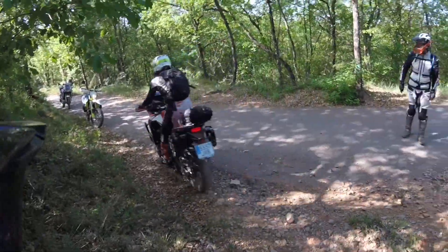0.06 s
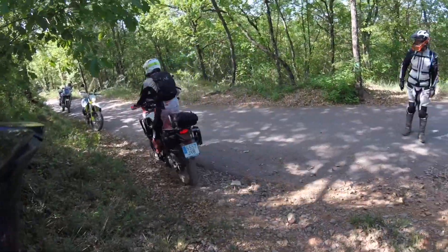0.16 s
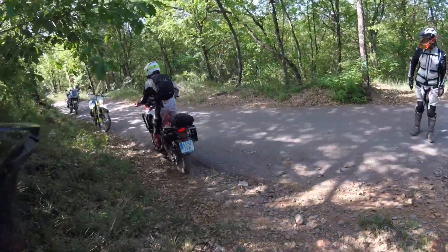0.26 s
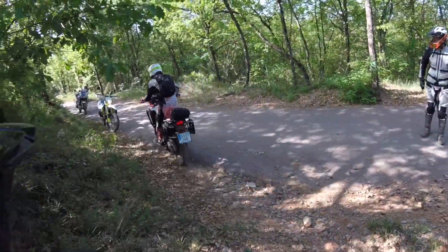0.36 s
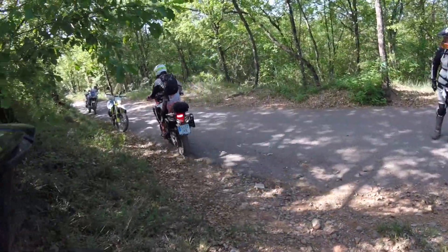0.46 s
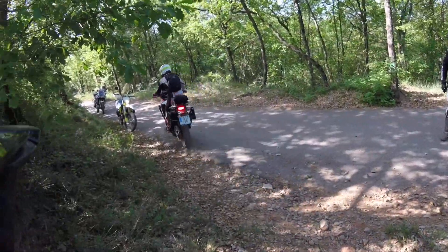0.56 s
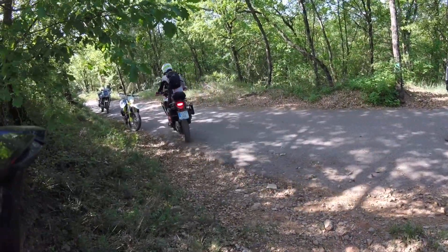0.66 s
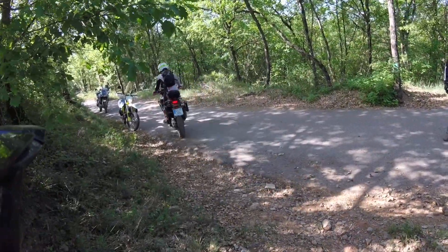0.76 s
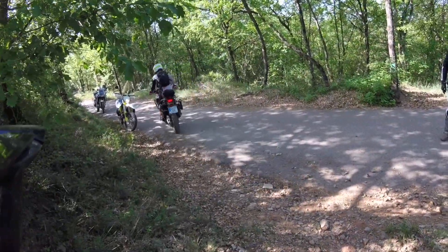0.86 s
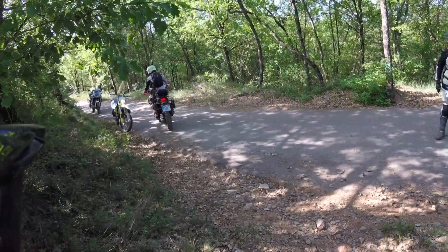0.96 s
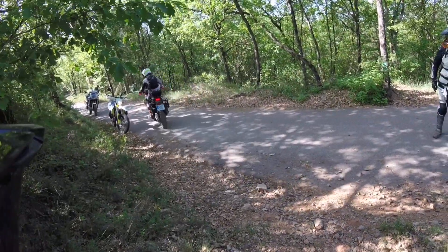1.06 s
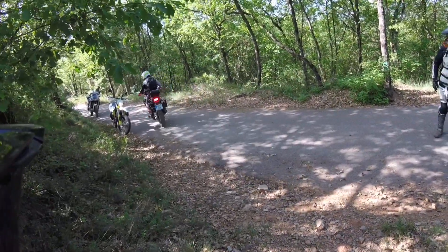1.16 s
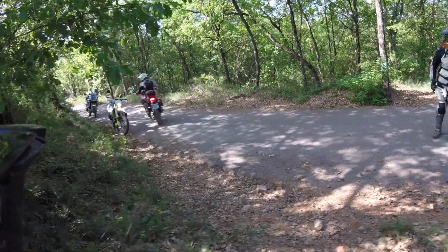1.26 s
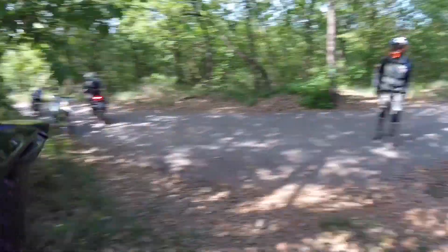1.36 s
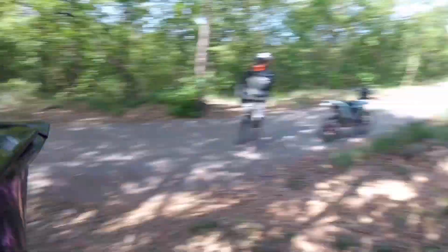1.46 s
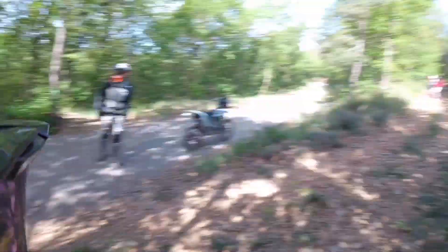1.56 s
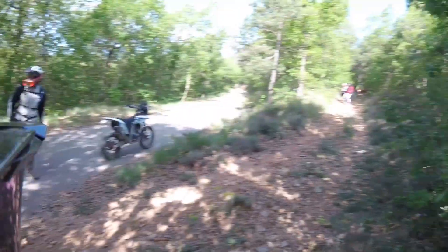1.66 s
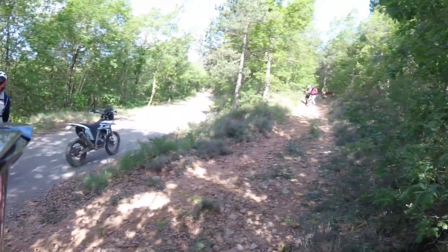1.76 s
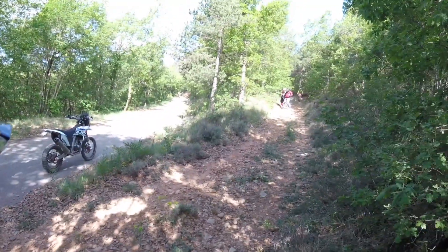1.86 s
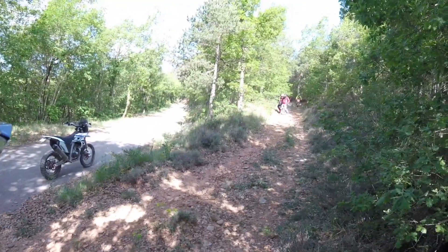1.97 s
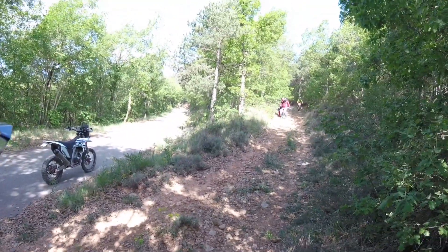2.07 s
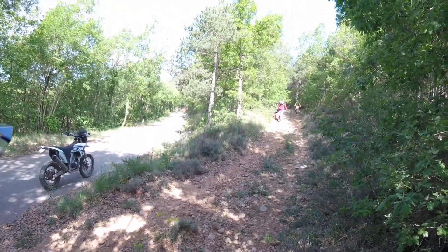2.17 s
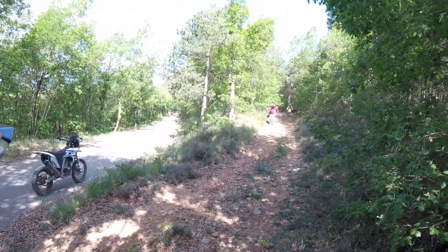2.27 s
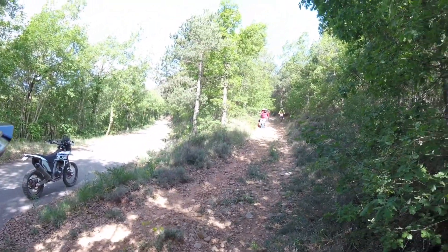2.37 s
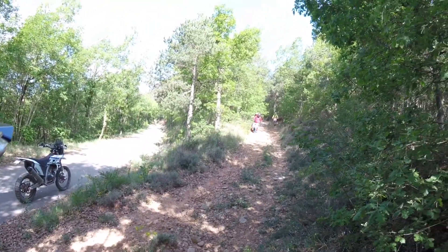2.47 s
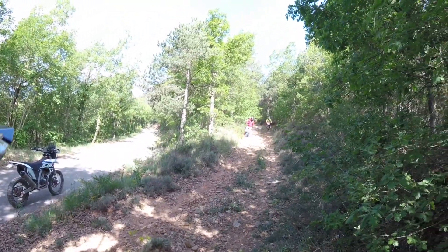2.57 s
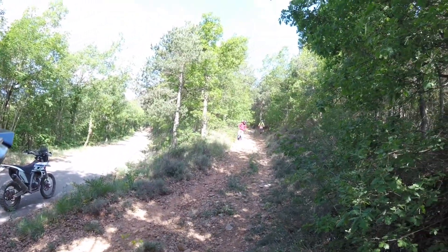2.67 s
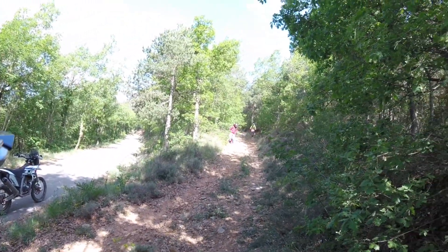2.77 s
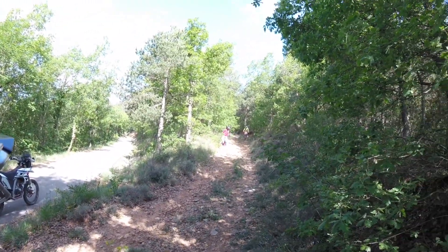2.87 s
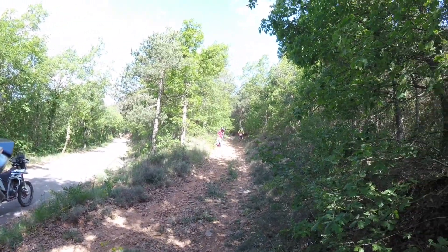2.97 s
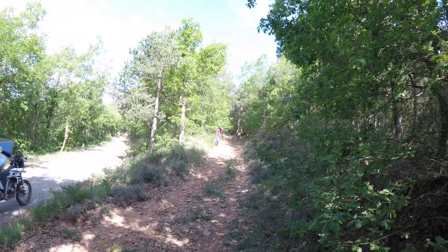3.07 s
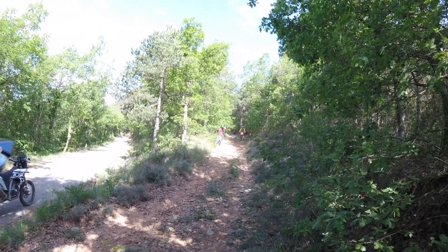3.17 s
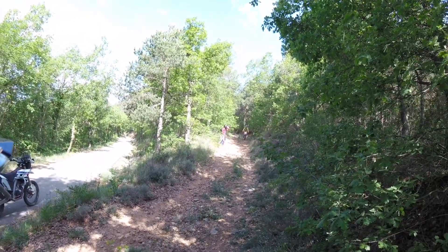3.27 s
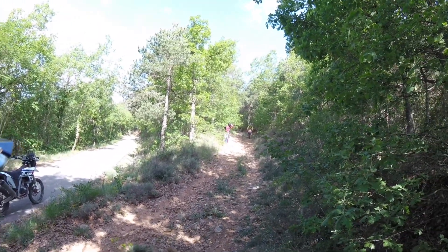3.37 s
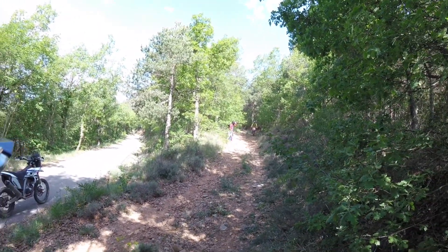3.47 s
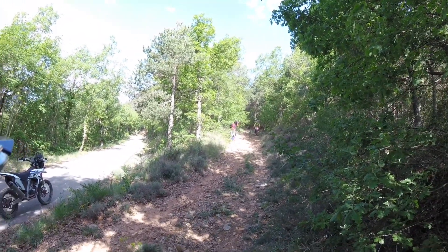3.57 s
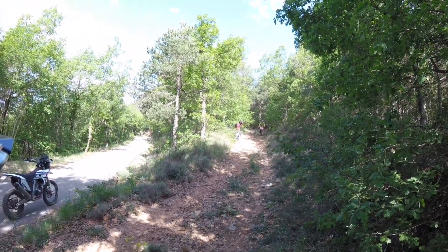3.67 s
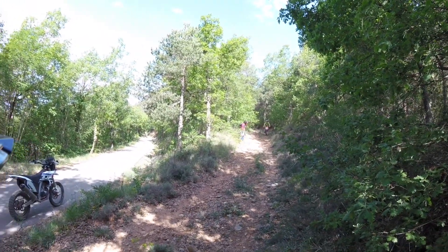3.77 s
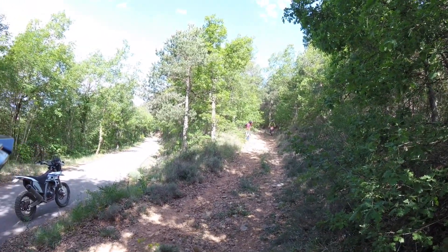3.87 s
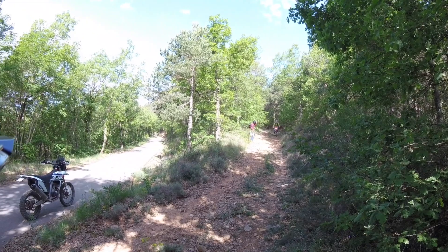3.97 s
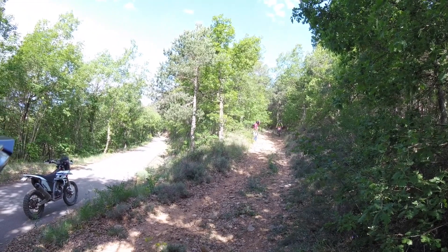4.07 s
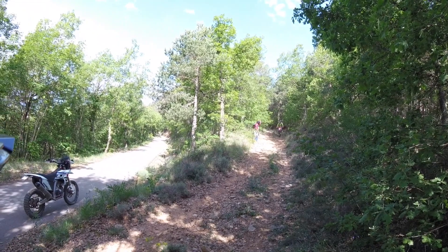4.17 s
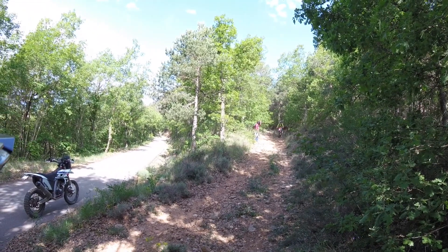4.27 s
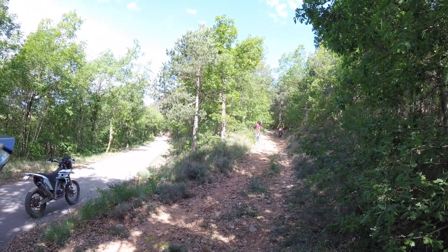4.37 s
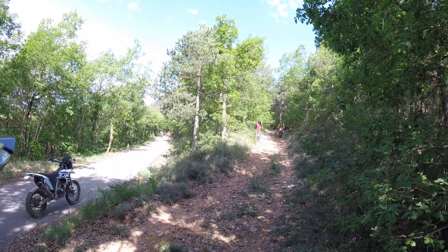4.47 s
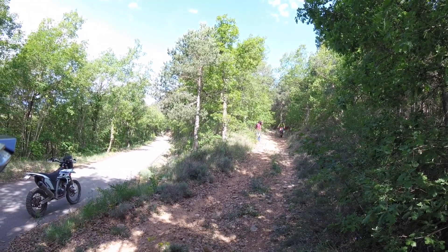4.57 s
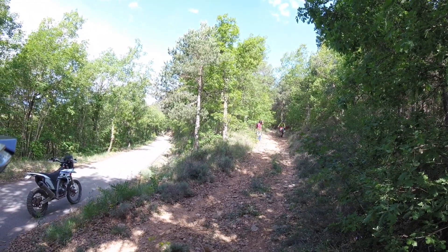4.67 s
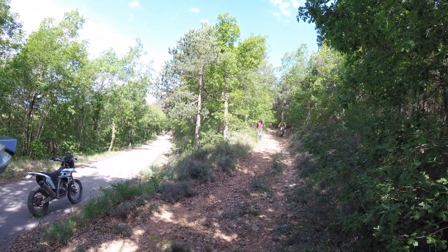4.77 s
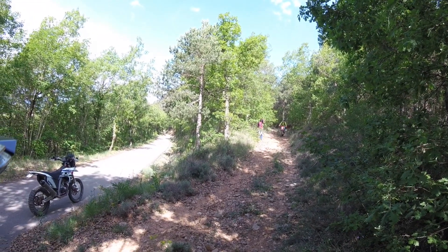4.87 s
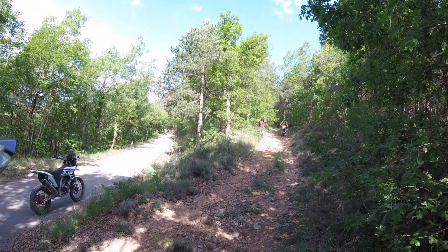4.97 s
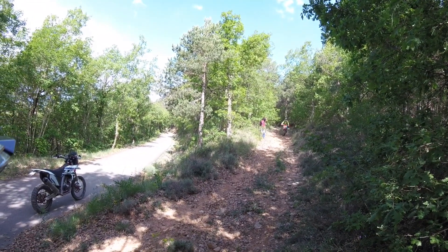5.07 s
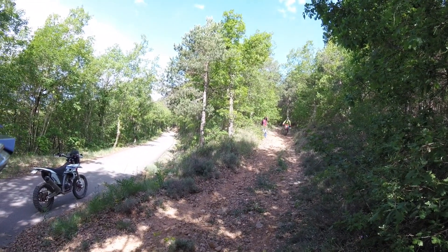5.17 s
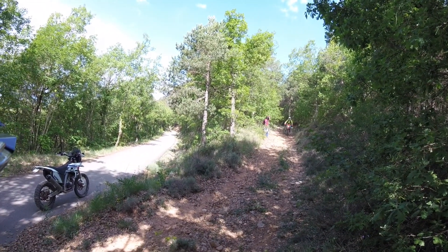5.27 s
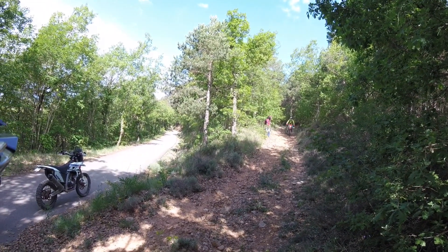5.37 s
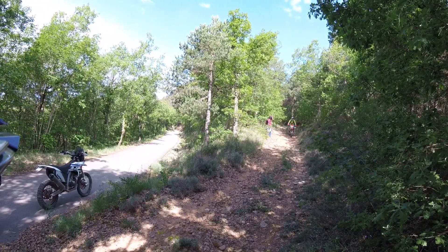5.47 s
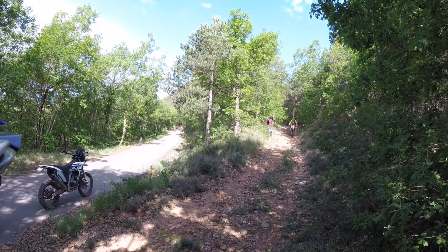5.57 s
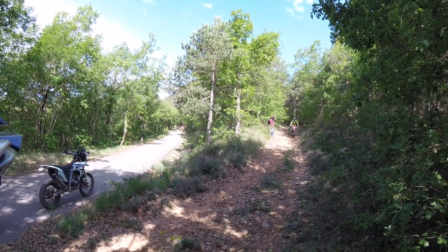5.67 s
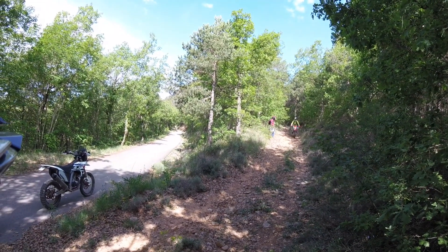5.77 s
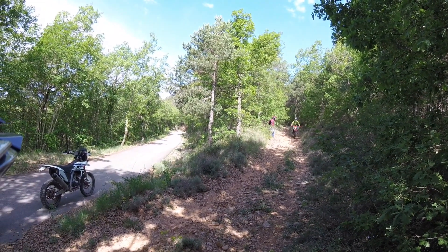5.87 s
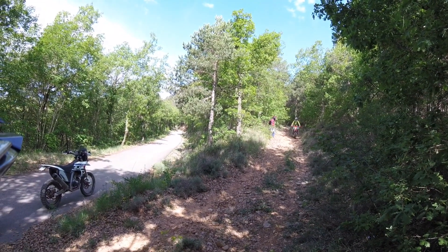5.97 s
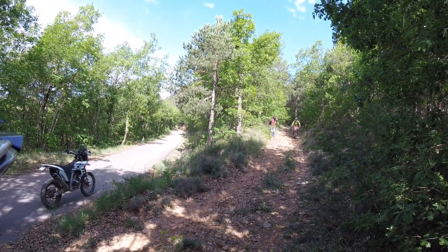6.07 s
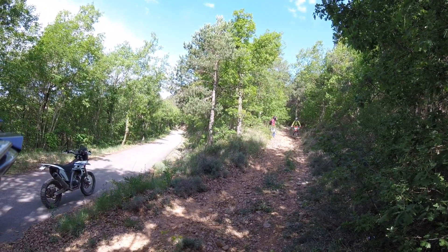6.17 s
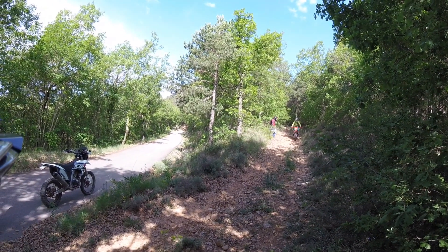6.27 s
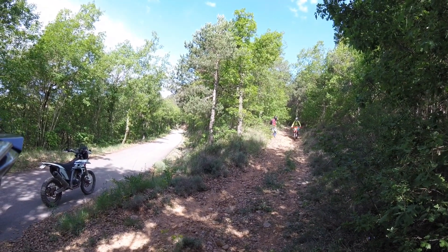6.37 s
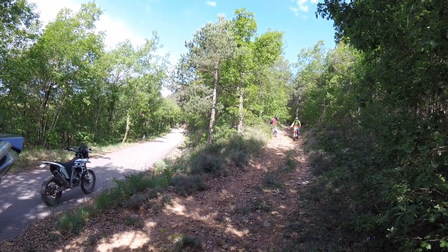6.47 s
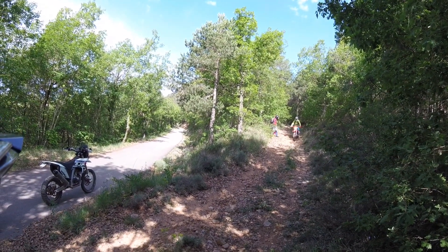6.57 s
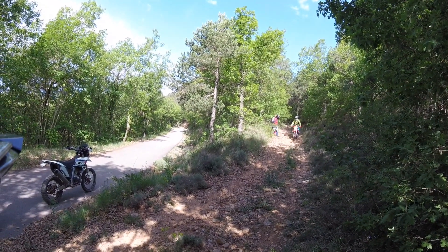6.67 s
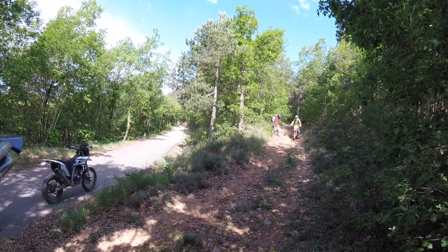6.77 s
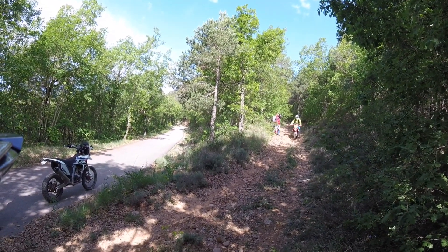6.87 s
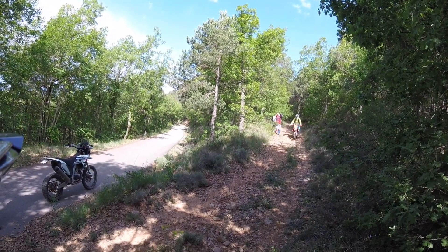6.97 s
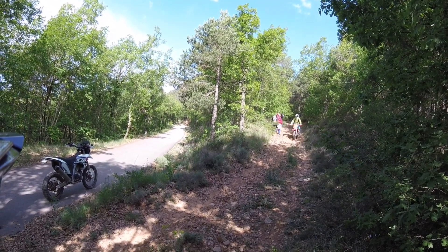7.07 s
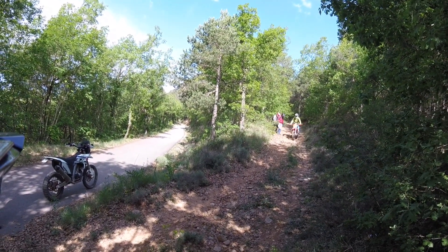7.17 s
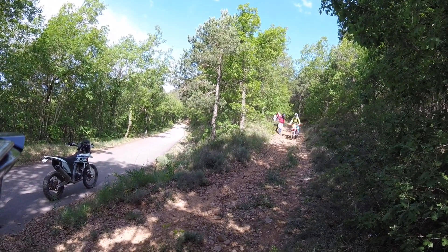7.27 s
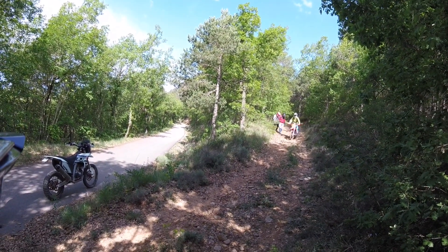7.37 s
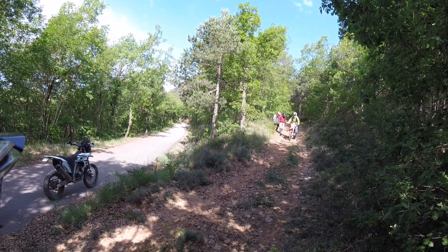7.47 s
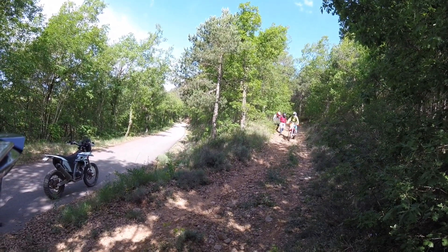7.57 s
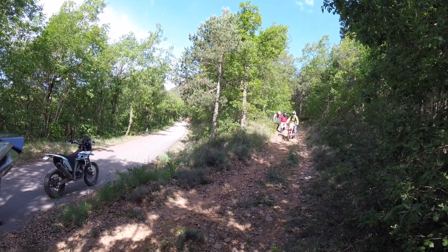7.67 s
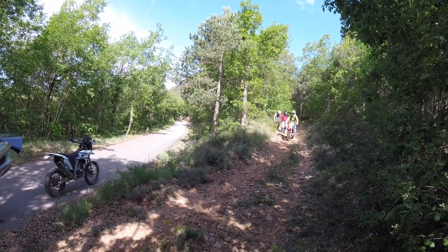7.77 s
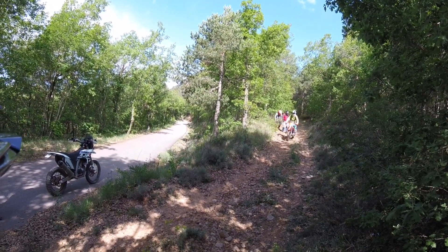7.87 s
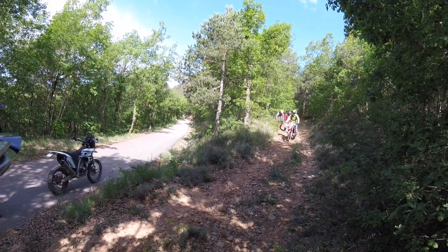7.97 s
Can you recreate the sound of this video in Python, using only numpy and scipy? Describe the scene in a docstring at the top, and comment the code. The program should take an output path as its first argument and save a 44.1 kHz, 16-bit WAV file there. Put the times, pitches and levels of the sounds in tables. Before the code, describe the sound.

Handheld camera microphone among trees: deep lumpy idle with metallic clatter starts near and fades over several seconds. Leaf hiss drops early. Faint gliding bird notes come from three to six seconds, then scattered gravel steps, scuffs and hollow knocks on the camera body. A quicker, single-beat motorcycle idle, quiet at first, swells toward the end. Muffled treble, no wind blasts.

```python
"""A forest track: a two-cylinder motorcycle idles and rolls off while boots crunch gravel and bump the camera.
As it recedes, tree echoes take a larger share of it; the leaf hiss drops, and from about 2 s the bass of the
whole scene fades out. From 3 s a bird sings in gliding whistles; more crunches, body rubs and dull bumps
follow. A single-cylinder motorcycle idles throughout, dips early, then comes nearer towards the end. Engines
are spikes rung through pipe resonances; woods, gravel and rubbing are shaped noise."""
import sys
import numpy as np
from scipy import signal
from scipy.fft import rfft, irfft, next_fast_len
from scipy.io import wavfile
from scipy.ndimage import uniform_filter1d

SR = 44100
rng = np.random.default_rng(int(sys.argv[2]) if len(sys.argv) > 2 else 0)


def generate_wav(signal):
    """Clip the signal to [-1, 1] and save it as 16-bit WAV at the path in sys.argv[1]."""
    frames = np.transpose(np.atleast_2d(signal))
    scaled = np.clip(frames, -1, 1) * 32767
    pcm = np.round(scaled).astype(np.int16)
    wavfile.write(sys.argv[1], SR, pcm)


N = 353373  # samples, about 8 s


def amp(db):
    """Decibels to linear gain."""
    return 10 ** (np.asarray(db) / 20)


def unit(x):
    """Scale a signal to rms 1."""
    return x / np.sqrt(np.mean(x ** 2) + 1e-20)


def along(points, hz):
    """Read (frequency [Hz], value) points on a log-frequency axis."""
    f, v = np.transpose(points)
    return np.interp(np.log(hz + 1), np.log(f + 1), v)


def curves(rows):
    """One automation curve over the scene for each column after the time."""
    seconds, *columns = np.transpose(rows)
    return [np.interp(np.arange(N) / SR, seconds, column) for column in columns]


def filtered(x, response):
    """Multiply the spectrum of x by a response of frequency, real or complex."""
    size = next_fast_len(N + SR // 2)
    return irfft(rfft(x, size) * response(np.fft.rfftfreq(size, 1 / SR)), size)[:N]


def rush(spectrum, patchy_db):
    """Noise of rms 1, coloured by (frequency [Hz], relative level [dB]), with patches of random gain."""
    grains = signal.stft(rng.standard_normal(N + 512), nperseg=512)[2]
    field = rng.standard_normal(grains.shape)
    field = uniform_filter1d(uniform_filter1d(field, 8, 0), 8, 1)
    noise = signal.istft(grains * amp(patchy_db * unit(field)), nperseg=512)[1][:N]
    return unit(filtered(noise, lambda hz: amp(along(spectrum, hz))))


def mode(f, hz, width_hz):
    """Causal resonance with gain 1 at its centre."""
    return 1j * f * width_hz / (hz * hz - f * f + 1j * f * width_hz)


def ringing(f, pipe, soft_hz):
    """Pipe modes heard through the soft edge of the pressure puff."""
    modes = sum(sign * amp(db) * mode(f, hz, width) for hz, width, db, sign in pipe)
    return modes / (1 + 1j * f / soft_hz) ** 2


# far engine murmur among the trees: (time [s], level [dB])
MURMUR_LEVEL = [(0, -24), (1, -28.5), (2, -29), (3, -32.5), (5, -37.5), (8, -34)]
# steady leaves and grit; the hiss drops as the camera swings round:
# (time [s], rustle level [dB], hiss level [dB])
WOODS_LEVEL = [(0, -39, -35), (.4, -44.5, -40.5), (1.36, -48, -43.5), (1.47, -50, -55), (2.2, -50.5, -52.5),
               (4.4, -49, -58), (6.3, -46.5, -55.5), (7.6, -45.5, -56), (7.8, -43, -54), (8, -43.5, -58)]
# colour of the murmur: (frequency [Hz], relative level [dB])
MURMUR_COLOUR = [(25, -23), (100, 11.5), (160, 2), (230, -2), (300, -13), (440, -13.5), (660, -19),
                 (1000, -40.5)]
# colour of the rustle: (frequency [Hz], relative level [dB])
RUSTLE_COLOUR = [(200, -12), (500, 2.5), (700, -7), (1080, 1.5), (1600, -5.5), (2100, -3), (2550, -9),
                 (3300, -9), (5000, -18.5)]
# swishes that swell out of the hiss; rise and fall each cover 10 dB:
# (time of peak [s], peak level [dB], rise [s], fall [s])
SWISHES = [(.11, -35.5, 0.092, 0.18), (2.23, -45, 0.034, 0.22), (2.78, -44, 0.12, 0.076),
           (3.08, -44, 0.11, 0.15), (3.86, -50.5, .04, .5), (5.27, -56.5, .03, 0.4),
           (6.17, -49, .04, 0.069), (6.3, -55, 0.033, .1), (6.62, -47, 0.16, 0.097),
           (6.68, -47, 0.022, 0.087), (7.27, -47.5, .5, 0.33), (7.78, -39, 0.14, 0.081),
           (7.96, -47, .05, .3)]


def woods():
    """A smeared low murmur, a gritty rustle and an equally gritty, slightly patchier high hiss with swishes."""
    murmur_db, = curves(MURMUR_LEVEL)
    rustle_db, hiss_db = curves(WOODS_LEVEL)
    t = np.arange(N) / SR
    swish_power = np.zeros(N)
    for s, db, rise, fall in SWISHES:
        drop_db = 10 * np.where(t < s, (s - t) / rise, (t - s) / fall)
        swish_power += amp(db - drop_db) ** 2
    # fast, fine-grained random gain shared by rustle and hiss
    grit = amp(2 * unit(uniform_filter1d(rng.standard_normal(N), 120)))
    rustle = unit(grit * rush(RUSTLE_COLOUR, patchy_db=1.5))
    hiss = unit(grit * rush([(2500, -42), (4000, 0.5), (8000, 4), (15000, -3.5)], patchy_db=2.0))
    murmur = amp(murmur_db) * rush(MURMUR_COLOUR, patchy_db=0)
    hiss_gain = np.sqrt(amp(hiss_db) ** 2 + swish_power)
    return murmur + amp(rustle_db) * rustle + hiss_gain * hiss


# bird notes, with the level at the crest of each note before the blur:
# (time [s], length [s], first pitch [Hz], last pitch [Hz], rms level [dB])
BIRD_NOTES = [(3.072, 0.13, 2940, 2810, -59.5), (3.276, 0.084, 2450, 2780, -58),
              (3.793, 0.065, 2350, 2530, -55), (4.1, .03, 3450, 3100, -55), (4.133, 0.03, 3400, 3260, -55),
              (4.419, 0.036, 2140, 2940, -52), (4.461, 0.045, 2970, 2870, -55),
              (4.579, 0.081, 3070, 3440, -52), (4.737, .055, 3920, 4130, -50),
              (4.875, 0.03, 3300, 3090, -53), (4.984, 0.071, 2890, 2100, -53.5),
              (5.205, 0.04, 3850, 3780, -57), (5.27, 0.053, 2660, 2810, -53), (5.43, .03, 3800, 3770, -59),
              (5.46, 0.02, 3500, 2690, -52), (5.48, 0.056, 2760, 2730, -56), (5.6, 0.023, 4300, 4160, -50),
              (5.62, 0.037, 4150, 4100, -48.5), (5.655, 0.023, 4100, 3570, -55),
              (5.806, 0.065, 3156, 3240, -48.5), (5.87, 0.033, 3410, 3270, -50),
              (5.966, 0.057, 2500, 2670, -56)]


def bird():
    """Gliding whistles with a short blur from the trees."""
    out = np.zeros(N + SR)
    for s, length, first_hz, last_hz, db in BIRD_NOTES:
        u = np.arange(round(length * SR)) / (length * SR)  # 0 to 1 through the note
        phase = 2 * np.pi * np.cumsum(first_hz + (last_hz - first_hz) * u) / SR
        swell = np.sin(np.pi * u) ** .4
        out[round(s * SR):][:len(u)] += np.sqrt(2) * amp(db) * swell * np.sin(phase)
    # decaying noise, 60 dB in 0.4 s, cut at 0.25 s
    tail = rng.standard_normal(SR // 4) * amp(-60 * np.arange(SR // 4) / SR / 0.4)
    blur = signal.fftconvolve(out, tail / np.linalg.norm(tail))[:N]
    return out[:N] + 0.54 * blur


# gravel crunches, with the crest of the swell before the settling stones are added:
# (time [s], crest level [dB], share near 1 kHz [dB], rise [ms])
CRUNCHES = [(0.073, -33.5, -1, 3.7), (0.11, -34.5, 3, 3.3), (0.36, -34.5, -21, 2.8), (3.826, -37.5, 0, 3.5),
            (5.2456, -42, 4.5, 4.6), (5.3685, -51, 6.5, 1.4), (5.542, -38, 0, 2.3), (6.1537, -38.5, 3, 3.8),
            (6.3068, -37, 2, 2.7), (6.61, -43, -2, 3.3), (6.68, -38.5, -8, 3), (7.642, -32, -1.5, 4.8),
            (7.705, -41, 1.5, 3), (7.761, -35.5, -5, 2.9), (7.837, -44, -4, 1.4)]


def gravel():
    """Short swells of grinding stones, with a hollow part near 1 kHz and a trickle after."""
    settle_db, settle_s = -15.5, 0.089  # trickling stones: level under the crest, decay time constant
    bright, hollow, t = np.zeros(N + SR), np.zeros(N + SR), np.arange(SR // 4) / SR
    for s, db, hollow_db, rise_ms in CRUNCHES:
        u = 1000 * t / rise_ms
        swell = amp(db) * (u * np.exp(1 - u) + amp(settle_db) * np.exp(-t / settle_s))
        bright[round(s * SR):][:len(t)] += swell
        hollow[round(s * SR):][:len(t)] += swell * amp(hollow_db)
    stones = rush([(300, -24), (1500, -7), (2200, -3), (3000, -6), (6500, 0), (15000, -20)], patchy_db=1)
    hollow_stones = rush([(400, -25), (800, -6), (1100, 0), (1500, -8), (2200, -25)], patchy_db=1)
    return bright[:N] * stones + hollow[:N] * hollow_stones


# rubbing on the camera body: (time [s], length [s], crest level [dB])
SCUFF_STROKES = [(5.287, 0.12, -36.5), (5.427, 0.062, -41), (6.174, 0.039, -36), (6.26, 0.32, -41.5),
                 (7.66, 0.054, -32), (7.743, 0.068, -36.5), (7.815, 0.065, -29.5), (7.937, 0.068, -29)]


def scuffs():
    """Fingers and strap rubbing the camera body: a lumpy low rumble."""
    t = np.arange(N) / SR
    strokes = np.zeros(N)
    for s, length, db in SCUFF_STROKES:
        strokes += amp(db) * np.sin(np.pi * np.clip((t - s) / length, 0, 1)) ** .5
    lumps = amp(6 * unit(uniform_filter1d(rng.standard_normal(N), 200)))
    rumble = rush([(150, -38), (280, 6.0), (420, 5), (650, -12), (1100, -12), (2500, -28)], patchy_db=0)
    return strokes * unit(lumps * rumble)


# dull bumps on the camera body: (time [s], strength [dB])
BUMP_HITS = [(0.11, 1.5), (5.282, -3), (5.449, -14), (6.383, -18), (6.441, -20), (7.666, -10), (7.687, -6),
             (7.855, -8), (7.884, -2), (7.982, -9.5)]
# modes of the camera body: (frequency [Hz], relative level [dB], 60 dB decay time [s])
BODY_MODES = [(369, -3.5, 0.0092), (704, -13, 0.0045), (1090, -20.5, 0.0037)]


def bumps():
    """Each bump rings the body modes briefly and bounces once at half strength, 6 ms later."""
    out, t = np.zeros(N + SR), np.arange(SR // 20) / SR
    ring = np.zeros(len(t))
    for hz, level, t60 in BODY_MODES:
        ring += amp(level - 60 * t / t60) * np.sin(2 * np.pi * hz * t)
    ring *= 1 - np.exp(-t / 0.0008)  # soft contact
    for s, db in BUMP_HITS:
        out[round(s * SR):][:len(t)] -= amp(db) * ring
        out[round((s + .006) * SR):][:len(t)] -= .5 * amp(db) * ring
    return out[:N]


def firings(speed, start, level, cylinders, jitter_s, scatter_db):
    """A spike per firing, a cycle every two turns; cylinders are (place in the cycle [0-1], level [dB])."""
    out = np.zeros(N)
    cycles_done = start + np.cumsum(curves(speed)[0] / 120) / SR  # rpm / 120 = cycles per second
    for place, cylinder_db in cylinders:
        cycle = np.arange(np.ceil(start - place), cycles_done[-1] - place) + place
        luck = rng.standard_normal((len(cycle), 2))  # timing, strength
        when = np.interp(cycle, cycles_done, np.arange(N)) + jitter_s * SR * luck[:, 0]
        out[np.clip(when, 0, N - 1).astype(int)] += amp(cylinder_db + scatter_db * luck[:, 1])
    return out * amp(curves(level)[0])


def exhaust(spikes, response):
    """Firings through a pipe; a lone firing of 0 dB peaks at 1."""
    peak = np.abs(filtered(signal.unit_impulse(N), response)).max()
    return filtered(spikes, response) / peak


# nominal peak of a firing as the single comes nearer: (time [s], level [dB])
SINGLE_LEVEL = [(0, -23), (2, -33.5), (3, -29.5), (5, -24.5), (7.6, -18), (7.9, -17.5), (7.96, -14)]
# its exhaust pipe and silencer resonances, before the firing peak is set:
# (frequency [Hz], width [Hz], relative level [dB], signed gain [factor])
SINGLE_PIPE = [(60, 75, -10.5, 1.3), (101, 46, -4, 0.9), (129.5, 37, -6.5, -6), (215.8, 36, 2.5, -2.5),
               (385, 110, -31, -3.5)]
# its hunting idle: (time [s], speed [rpm])
SINGLE_SPEED = [(0, 2040), (1, 2016.2), (1.4, 2075.7), (1.8, 1765.7), (3, 1827.2), (3.3, 1819),
                (3.6, 1928.2), (3.9, 1725.7), (4.2, 1949.4), (4.9, 1988), (5.4, 1752.6), (5.7, 1880.5),
                (6.6, 1812.6), (7.3, 1895.4), (7.7, 1798.6), (8, 1816.3)]


def single():
    """One sharp puff a cycle, returned once by the silencer's end wall; the pipe rings softly after it."""
    spikes = firings(SINGLE_SPEED, .933, SINGLE_LEVEL, [(.015, 0)], jitter_s=.0005, scatter_db=.8)

    def response(f):
        puff = -mode(f, 245, 150) * mode(f, 350, 320) / (1 + 1j * f / 700) ** 4
        end_wall = 1 + .6 * np.exp(-2j * np.pi * f * .0093)  # return after 9.3 ms
        return 1.3 * puff * end_wall + ringing(f, SINGLE_PIPE, soft_hz=330)

    return exhaust(spikes, response)


# nominal peak of a firing as the twin recedes: (time [s], level [dB])
TWIN_LEVEL = [(0, -8), (1.5, -10.5), (3, -10.5), (4, -15), (5, -18), (6, -22), (7, -26.5), (8, -26)]
# its exhaust pipe and silencer resonances, before the firing peak is set:
# (frequency [Hz], width [Hz], relative level [dB], signed gain [factor])
TWIN_PIPE = [(41, 29.2, -2.5, 1), (47.4, 8.07, 7.5, -0.93), (84.5, 19.5, 1, 0.94), (119.2, 17, -4, -1.24),
             (157.9, 25.7, -7.5, -0.71), (246, 100, -43, 0.89)]
# its hunting idle: (time [s], speed [rpm])
TWIN_SPEED = [(0, 1206.3), (.5, 1181.8), (.8, 1250.7), (1.4, 1177.1), (1.7, 1230.2), (2.4, 1159.7),
              (2.7, 1192.4), (3.3, 1211.3), (3.7, 1186.5), (4.3, 1167.3), (4.6, 1231.2), (4.9, 1163.3),
              (5.4, 1234.6), (6.1, 1179), (6.6, 1259.4), (6.9, 1198), (7.2, 1216.3), (8, 1166.8)]
# valve gear, chain and tyres, and the silencer shell:
# (time [s], clatter level [dB], bark gain [dB])
CLATTER_LEVEL = [(0, -35.5, -35), (.12, -36, -32.5), (.7, -38, -34.5), (.95, -41, -43.5),
                 (1.35, -42.5, -44.5), (1.45, -49.5, -44.5), (2, -50, -53.5), (2.6, -53.5, -49),
                 (3.2, -55, -75)]
# colour of the clatter: (frequency [Hz], relative level [dB])
CASING_COLOUR = [(150, -40), (500, -29), (720, -33), (1100, -36), (1400, -4), (1880, 9), (2300, -6),
                 (2800, -1), (3300, -30), (15000, -0.5)]
# fuzzy hum near 900 Hz that follows the twin away: (time [s], level [dB])
HUM_LEVEL = [(0, -51), (.8, -52), (1.5, -53), (2.2, -54), (2.8, -57), (3.3, -80)]


def twin():
    """Uneven firing, about 263 then 457 degrees apart, shakes the casing and makes the silencer shell bark."""
    start = .642  # place in the cycle at 0 s
    spikes = firings(TWIN_SPEED, start, TWIN_LEVEL, [(0, 0), (.365, -1)], jitter_s=.0006, scatter_db=1.2)
    # blows on the metal trail the firings by 0.04 of a cycle
    blows = firings(TWIN_SPEED, start, [(0, 0)], [(.04, 0), (.405, -6)], jitter_s=.001, scatter_db=2)
    shake = unit(filtered(blows, lambda f: 1 / ((1 + 1j * f / 14) * (1 + 1j * f / 150))))
    clatter_db, bark_db = curves(CLATTER_LEVEL)
    clatter = unit((1.6 + shake) * rush(CASING_COLOUR, patchy_db=-0.5))
    rasp_colour = [(250, -52), (420, -1.5), (500, 0.5), (555, -3.5), (610, -6), (750, -24.0)]
    rasp = unit((2.0 + shake) * rush(rasp_colour, patchy_db=-1.0))
    shell = unit(filtered(blows, lambda f: mode(f, 558.0, 19) * mode(f, 644, 200)))
    bark = 0.46 * rasp + 0.57 * shell
    hum_colour = [(780, -29), (870, 0.5), (915, -8.5), (960, -5), (1060, -29)]
    hum = amp(curves(HUM_LEVEL)[0]) * rush(hum_colour, patchy_db=-1)
    pipe = exhaust(spikes, lambda f: ringing(f, TWIN_PIPE, soft_hz=544))
    return pipe + hum + amp(clatter_db) * clatter + amp(bark_db) * bark


def trunks(x, echo_db):
    """Scattered copies off the tree trunks, drawn anew each half second as the engines move."""
    out, hop, t = np.zeros(N + SR), SR // 2, np.arange(SR // 4) / SR
    for start in range(-hop, N, hop):
        k = np.arange(max(start, 0), min(start + 2 * hop, N))
        crossfade = np.sin(np.pi * (k - start) / (2 * hop)) ** 2
        # first echo after 12 ms, decay of 60 dB in 0.52 s, cut at 0.25 s
        tail = rng.standard_normal(len(t)) * amp(-60 * t / 0.52) * (t > .012)
        wet = signal.fftconvolve(x[k] * crossfade, tail / np.linalg.norm(tail))
        out[k[0]:][:len(wet)] += wet
    return x + amp(echo_db) * out[:N]


# share of tree echoes, growing as the twin recedes: (time [s], level [dB])
TWIN_ECHO = [(0, -18), (2, -14), (4, -7), (8, -5)]


def scene():
    """Both engines among the trunks, over the woods, boots, camera handling and bird."""
    engines = trunks(twin(), echo_db=curves(TWIN_ECHO)[0]) + trunks(single(), echo_db=-14)
    return (engines + woods() + gravel() + bumps() + scuffs() + bird())[None]


# microphone colour: (frequency [Hz], gain [dB])
MIC_COLOUR = [(3300, 1), (4400, -10), (5100, -0.5), (5800, 7.5), (6300, 2.5), (7000, -7.5), (10400, -11.5),
              (11600, -23.5), (13500, -29), (15000, -35)]
# gain of the bass, where anything above 0 counts as 0: (time [s], gain [dB])
BASS_GAIN = [(0, 4.5), (1.5, -0.5), (2.5, -3), (3.2, -6), (4, -13.5), (4.4, -19), (5, -20.5), (6, -25),
             (8, -32)]


def record(dry):
    """Microphone colour and self-noise, the fading bass, and the band limit."""
    x = filtered(dry[0], lambda hz: amp(along(MIC_COLOUR, hz)))
    x = x + amp(-62.0) * rush([(3000, -7.5), (8000, 2.5), (12000, -7), (15000, -12.5)], patchy_db=-1.0)
    bass = filtered(x, lambda hz: 1 / (1 + (hz / 131) ** 26))  # steep split at 131 Hz
    bass_db, = curves(BASS_GAIN)
    x = x - bass * (1 - amp(np.minimum(bass_db, 0)))
    top_hz = 15190
    return filtered(x, lambda hz: (hz < top_hz) * hz / (hz + 4))[None]  # also removes the lowest rumble


dry = scene()
out = record(dry)
generate_wav(out)
```